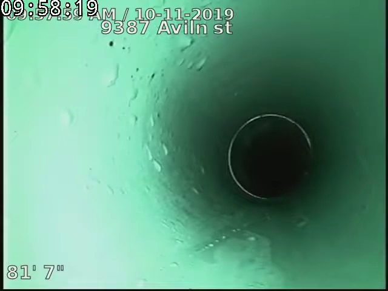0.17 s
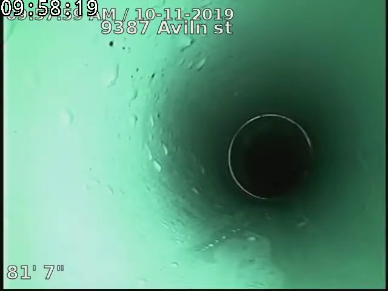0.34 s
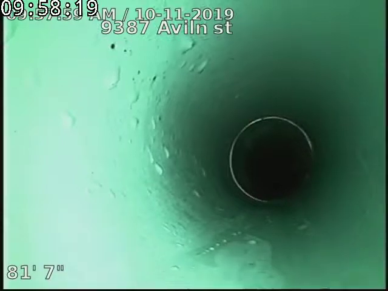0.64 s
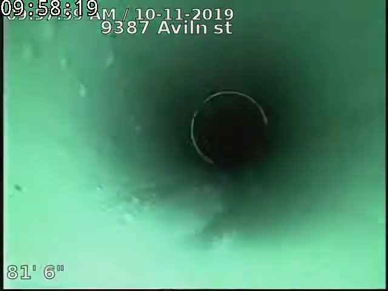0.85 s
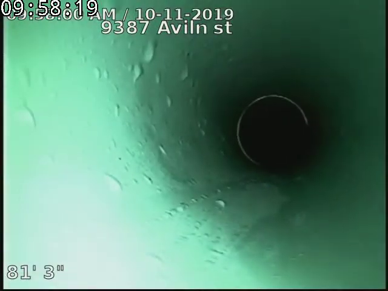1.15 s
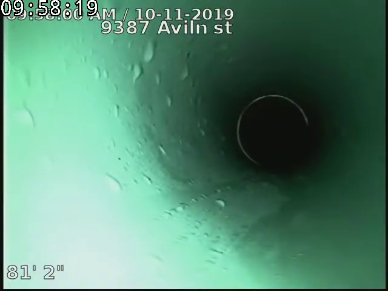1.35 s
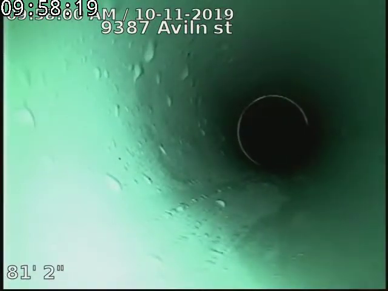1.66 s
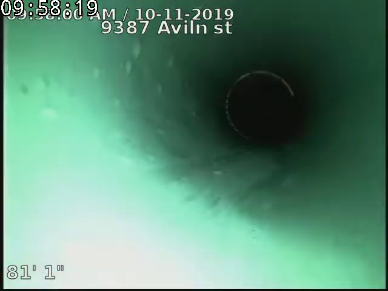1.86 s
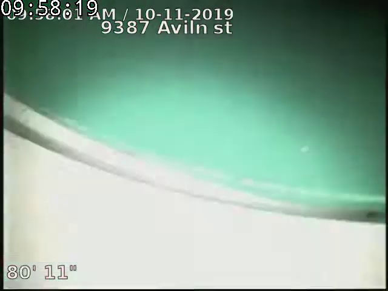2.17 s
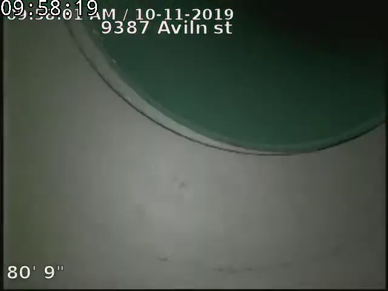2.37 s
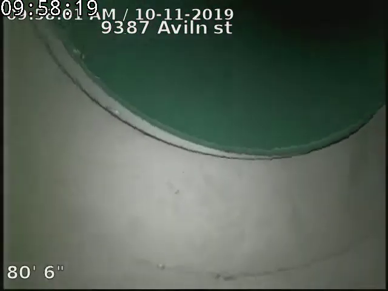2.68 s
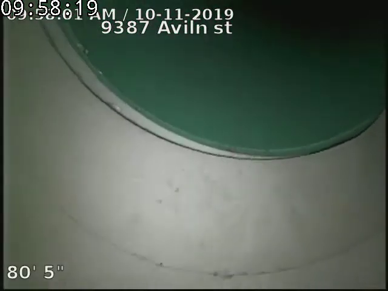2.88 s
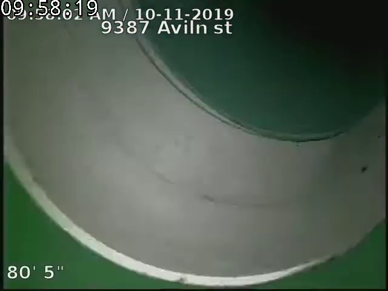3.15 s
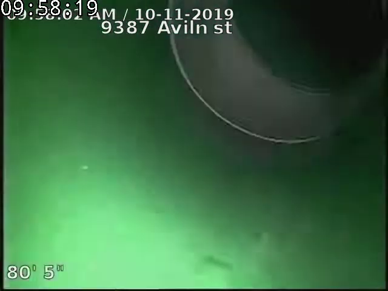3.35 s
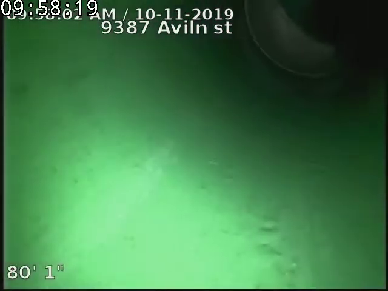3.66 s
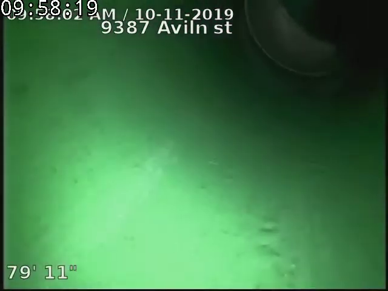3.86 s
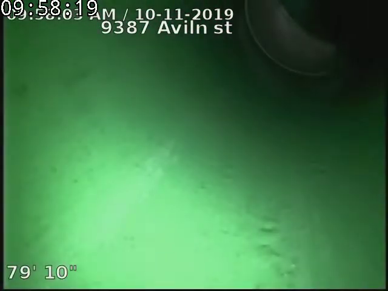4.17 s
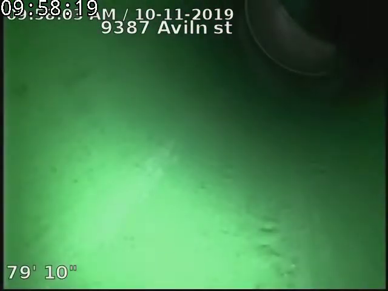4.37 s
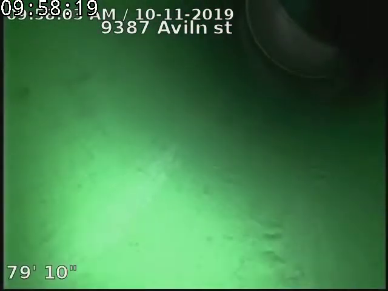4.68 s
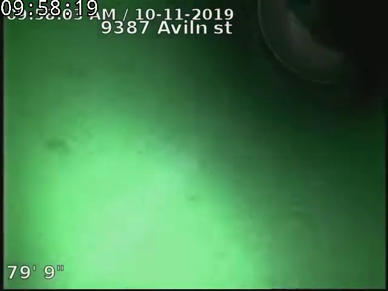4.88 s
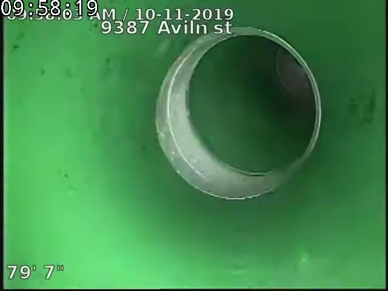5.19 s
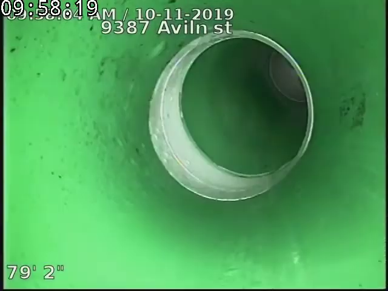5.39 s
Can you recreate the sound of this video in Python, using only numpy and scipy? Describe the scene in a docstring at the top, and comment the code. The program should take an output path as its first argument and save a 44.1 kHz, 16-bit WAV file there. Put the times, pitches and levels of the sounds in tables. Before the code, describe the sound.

A stiff rod is hauled hand over hand through a guide, with dry bright scrapes, sharp snaps against metal bars and dull frame thumps.

```python
"""A stiff fibreglass rod scrapes through its guide as it is hauled out of a drain pipe hand over hand:
sparse random friction impulses excite resonances, in four long pulls and many light slips.
Between pulls a glove swishes forward along the rod: denser impulses, shaped by the speed of the hand.
The coil snaps on the cage bars and thumps the frame (sums of decaying modes); the turning reel rumbles,
its hoop hums (impulses through narrow resonances), and faint room and preamp hiss lies below."""
import sys
import numpy as np
from scipy import signal
from scipy.fft import rfft, irfft
from scipy.io import wavfile
from scipy.ndimage import map_coordinates

SR = 44100
rng = np.random.default_rng(int(sys.argv[2]) if len(sys.argv) > 2 else 0)


def wav_record(signal):
    """Record a signal, one row per channel, as 16-bit PCM in the file named by sys.argv[1]."""
    frames = np.transpose(np.atleast_2d(signal))
    bounded = np.clip(frames, -1, 1)
    # unit amplitude maps onto the largest positive 16-bit level
    quanta = np.round(bounded * 32767).astype(np.int16)
    wavfile.write(sys.argv[1], SR, quanta)


N = 243873


def amp(db):
    """Logarithmic level law: 20 dB is a factor of ten in amplitude."""
    return 10 ** (np.asarray(db) / 20)


def rms_one(x):
    """Power normalisation: scale to rms 1."""
    return x / np.sqrt(np.mean(x ** 2) + 1e-20)


def in_time(rows):
    """Linear interpolation: the columns after the time column become curves over all samples."""
    time_s, *columns = np.transpose(rows)
    return [np.interp(np.arange(N) / SR, time_s, column) for column in columns]


def drift(rate_hz):
    """Low-passed noise: a random curve of rms 1, made at a twentieth of the sample rate."""
    pole = np.exp(-40 * np.pi * rate_hz / SR)
    noise = rng.standard_normal(N // 20 + 2002)
    slow = signal.lfilter([1], [1, -2 * pole, pole * pole], noise)[2000:]   # without the onset
    return np.interp(np.arange(N) / 20, np.arange(len(slow)), rms_one(slow))


def grit(per_s, spread_db):
    """Stick-slip friction: impulses at random moments with uneven sizes and either sign."""
    sizes = amp(spread_db * np.minimum(rng.exponential(1, N), 4))
    signed = sizes * rng.choice([-1, 1], N)
    return signed * (rng.random(N) < per_s / SR) + 1e-18


def resonate(x, peaks, patchy_db, rate_hz=6.0, order=1):
    """Parallel resonance: each peak flickers as the contact point wanders; the sum has rms 1."""
    out = 0
    for k, (hz, width_hz, level_db) in enumerate(peaks):
        pole = np.exp(-np.pi * width_hz / SR)
        feedback = [1, -2 * pole * np.cos(2 * np.pi * hz / SR), pole * pole]
        band = x
        for _ in range(order):
            band = signal.lfilter([(1 - pole * pole) / 2, 0, (pole * pole - 1) / 2], feedback, band)
        sign = (-1) ** (k * order)
        out = out + sign * amp(level_db + patchy_db * drift(rate_hz)) * band
    return rms_one(out)


def coloured(x, spectrum):
    """Linear filtering: shape by gains in dB over log frequency, then scale to rms 1."""
    hz, gain_db = np.transpose(spectrum)
    grid_hz = np.maximum(np.fft.rfftfreq(N, 1 / SR), 1)
    gain = amp(np.interp(np.log(grid_hz), np.log(hz), gain_db))
    return rms_one(irfft(rfft(x) * gain, N))


def ring(hz, t60_s, size):
    """Damped free vibration: a sine that loses 60 dB in t60_s."""
    t = np.arange(size) / SR
    return np.sin(2 * np.pi * hz * t) * amp(-60 * t / t60_s)


def high_pass(x, hz):
    """Radiation efficiency: a small body radiates little bass."""
    return signal.sosfilt(signal.butter(2, hz, "high", fs=SR, output="sos"), x + 1e-18)


def wander(x, share, rate_hz):
    """Frequency modulation: read x at an uneven speed so that its pitch wavers."""
    position = np.cumsum(1 + share * drift(rate_hz)) % (N - 1)
    return map_coordinates(x, [position], order=3)


def add(out, x, start_s):
    """Superposition: mix x into out from start_s."""
    i = round(start_s * SR)
    out[i:i + len(x)] += x[:N - i]


def air():
    """Stationary noise: coloured room and preamp hiss with a small drift in level."""
    # hiss spectrum: hz, gain_db
    hiss_spectrum = [(18, -12), (30, -7.5), (86, 0.5), (240, -4.5), (381, -21), (800, -30), (1400, -24),
                     (2800, -25.5), (5370, -16.5), (8320, -21.5), (10800, -11.5), (13900, -22.5)]
    return amp(-57.5 + 2.0 * drift(7.4)) * coloured(rng.standard_normal(N), hiss_spectrum)


def reel(hum):
    """Forced resonance: small jolts keep the cage and its hoop sounding while the coil turns."""
    # rumble of the turning reel: time_s, level_db
    rumble_levels = [(0.0, -57), (0.03, -62), (0.37, -60), (0.4, -48.5), (0.52, -53), (0.542, -36.5),
                     (0.58, -44.5), (0.63, -50), (1.26, -62.5), (1.57, -45), (1.62, -53.5), (1.91, -61),
                     (1.96, -50), (2.28, -55.5), (2.46, -43.5), (2.79, -63.5), (2.91, -47), (2.94, -56),
                     (3.36, -50), (4.31, -67), (4.36, -49.5), (4.45, -48), (5.11, -53.5), (5.25, -70.5),
                     (5.3, -54), (5.53, -62)]
    # cage resonances: pitch_hz, width_hz, level_db
    cage_peaks = [(62.5, 23, -1.5), (120.6, 20.2, 4), (245.3, 66, 0.5), (307, 293, -6.5), (470, 185, -6.5)]
    # hoop resonances: pitch_hz, width_hz (of each of two passes), level_db
    hoop_peaks = [(894, 52, 0.5), (918.2, 34.5, -0.5), (1003, 95, -6), (1072, 80, -6.5)]
    hum_idle_db = -76.5   # the hoop never falls quite silent
    rumble_db, = in_time(rumble_levels)
    rumble = resonate(grit(900, 2.8), cage_peaks, patchy_db=2.0)
    hoop = resonate(grit(4000, 2.0), hoop_peaks, patchy_db=1.5, rate_hz=10.0, order=2)
    hoop = wander(hoop, share=0.0091, rate_hz=7.98)
    hum_gain = np.hypot(hum, amp(hum_idle_db))
    return amp(rumble_db + 2.0 * drift(4.5)) * rumble + hum_gain * hoop


def thumps():
    """Modal excitation: uneven shoves of the coil drive the frame; harder ones reach the upper modes."""
    # blows on the frame: start_s, level_db, hardness_db (upper modes), boom_db (lowest mode),
    # lean_s (time scale of the shove on the lowest mode)
    blows = [(0.538, -35, -7, -19, .02), (0.829, -51, -14, 17, 0.064), (1.074, -36.5, 2, -10, .015),
             (1.192, -34, 1.5, -9, 0.019), (1.273, -51.5, -20, 17, 0.038), (1.425, -15, -4, 6, 0.03),
             (1.56, -53, 6, 7, .015), (2.013, -23, -7.5, -4, 0.029), (2.347, -28.5, -8, -1, 0.0078),
             (2.436, -28, -8, -25, .015), (2.499, -21, -11, 3, 0.028), (2.531, -27, -13, 8.5, 0.016),
             (2.849, -52, -12, 23.5, 0.022), (3.125, -29.5, -12, 5.5, 0.017), (3.25, -36, 1.5, 9.5, 0.022),
             (3.573, -24, -22, -2, 0.022), (4.223, -44.5, -5, -6, .02), (4.423, -32.5, -0.5, 0, 0.012),
             (4.953, -20, -20, -4.5, 0.019), (5.286, -52.5, 6.5, 5, 0.023)]
    # frame modes: pitch_hz, level_db, t60_s
    frame_modes = [(239.7, -12.5, 0.12), (307.4, -15, 0.052), (456, -13, 0.029), (512, -11.5, 0.0032),
                   (610, -18, 0.016), (946, -20, 0.21), (1091, -9, 0.019), (1510, -15, 0.0063),
                   (1744, -20, 0.073)]
    out, size = np.zeros(N), 8000
    t = np.arange(size) / SR
    for start_s, thump_db, hard_db, boom_db, lean_s in blows:
        hit = 0
        for hz, mode_db, t60_s in frame_modes:
            lowest = hz < 280
            # above the lowest mode, lower modes take longer to build up
            build_s = lean_s if lowest else 0.021 * (300 / hz) ** .5
            phase = t / build_s
            # the shove is partly in step with the mode, most firmly with the lowest
            in_step = 1 if lowest else 0.18
            rocking = rng.standard_normal(size) + in_step * np.sin(2 * np.pi * hz * t)
            shove = rocking * np.sqrt(phase) * np.exp(-3 * phase ** 2)
            mode = signal.fftconvolve(shove, ring(hz, t60_s, size))[:size]
            gain = amp(mode_db + hard_db * (hz > 580) + boom_db * lowest)
            hit = hit + gain * mode / np.abs(mode).max()
        add(out, amp(thump_db) * hit, start_s)
    return high_pass(out, 223)


def snaps():
    """Impact on a bar: a brief burst of contacts rings its modes; a short rasp follows as the rod settles."""
    # rod snaps on a bar: start_s, level_db, low_reach_db (low modes), top_reach_db (top modes)
    impacts = [(0.252, -37.5, 19, -18), (0.3326, -39, -4, -10), (0.5478, -12, -14, -6),
               (0.946, -41, 19, -8), (1.1917, -32, 23, -19), (1.199, -38, 29, -15), (1.3308, -36, 12, -8),
               (1.4233, -22, 2, -16), (1.4265, -14.5, -19, 0), (1.428, -18.5, 3, 12),
               (2.4394, -5.5, -6.5, -23), (2.517, -27, 11, -14), (2.6999, -38, -11, 32),
               (3.549, -32, -27, 15), (3.5748, -7.5, -3, -28), (3.94, -35, -25, 13), (4.346, -27, -25, 28),
               (4.4261, -14, -28, -6), (5.468, -35, 22.5, 19)]
    # bar modes: pitch_hz, level_db, t60_s (before the shortening of light touches)
    bar_modes = [(1138, -3.5, 0.038), (2050, -2, 0.02), (2730, -5.5, 0.024), (3830, 2.5, 0.015),
                 (4350, -1.5, 0.013), (4920, 6, 0.0034), (5510, 0, 0.0098), (7260, 7, 0.0085),
                 (9320, 8, 0.0057), (11090, 11.5, 0.0042)]
    # a light touch rings shorter and lands on another bar: shares
    light_damping, light_detune = 0.12, 0.18
    out, size = np.zeros(N), 5000
    t = np.arange(size) / SR
    for start_s, snap_db, low_db, top_db in impacts:
        body = 0
        light = np.clip((-22 - snap_db) / 10, 0, 1)   # 0 firm, 1 light
        for hz, mode_db, t60_s in bar_modes:
            reach_db = np.interp(hz, [1500, 4000, 6000, 8500], [low_db, 0, 0, top_db])
            gain = amp(mode_db + reach_db + rng.normal(0, 1 + 2 * light))
            mode_hz = hz * (1 + light_detune * light * rng.uniform(-0.57, 1))
            body = body + gain * ring(mode_hz, t60_s * (1 - light_damping * light), size)
        # one full contact, then noise from 15 dB lower that loses 60 dB in 5 ms
        contacts = rng.standard_normal(size) * amp(-60 * t / .005 - 15)
        contacts[0] = 1
        hit = signal.fftconvolve(contacts, body)[:size]
        rasp = rng.standard_normal(size) * amp(-19.5 - 60 * t / 0.029) * np.minimum(t / 0.00067, 1)
        add(out, amp(snap_db) * (hit / np.abs(hit).max() + rasp), start_s)
    return high_pass(out, 400)


def swishes():
    """Sliding friction of fabric on smooth rod: dense slips whose loudness follows the hand's speed."""
    # glove strokes: start_s, length_s, fastest (share of length), level_db, sheen_db (very top),
    # lag_s (delay of the lower part)
    strokes = [(0.954, 0.21, 0.44, -34.5, -3.5, 0.00033), (2.261, 0.18, 0.71, -30, -2, 0.0024),
               (3.602, 0.2, 0.71, -31, -1, 0.0074), (5.104, 0.21, 0.51, -34, 1, 0.012)]
    # friction spectrum: hz, gain_db
    fabric_spectrum = [(900, -48), (1400, -26), (1900, -10.5), (3100, -9.5), (5200, -6.5), (7000, -4),
                       (8800, -4), (11000, 7.5), (12300, 3.5), (13800, -0.5)]
    # rod ringing under the glove: pitch_hz, width_hz, level_db
    glove_rings = [(7000, 260, 0.55), (7650, 110, 2.5), (11600, 300, 1.6), (13000, 1100, 1.5)]
    rings_db = -16.5
    cruise = 0.87   # share of the stroke's arch above which the hand keeps a steady speed
    arch_power = 1.27   # gain grows with this power of the hand's speed
    t = np.arange(N) / SR
    slips = coloured(grit(14000, 0.97), fabric_spectrum)
    ringing = resonate(grit(10000, 0.9), glove_rings, patchy_db=2.0, rate_hz=16.0)
    slips = rms_one(slips + amp(rings_db) * ringing)
    hz = np.fft.rfftfreq(N, 1 / SR)
    top = irfft(rfft(slips) * np.clip((hz - 8000) / 3000, 0, 1), N)
    lower = slips - top
    out = 0
    for start_s, length_s, fastest, stroke_db, sheen_db, lag_s in strokes:
        for part, late_s, part_db in (top, 0, stroke_db + sheen_db), (lower, lag_s, stroke_db):
            turn = np.interp((t - start_s - late_s) / length_s, [0, fastest, 1], [0, .5, 1])
            speed = np.minimum(np.abs(np.sin(np.pi * turn)) / cruise, 1)
            out = out + amp(part_db) * speed ** arch_power * part
    return amp(0.46 * drift(110.0)) * out


def pull_gain():
    """Amplitude envelopes: scrape and hum gains of the long pulls, silent between them."""
    # four long pulls, each a list of: time_s, scrape_db, hoop_hum_db
    pull_curves = [
        [(0.32, -62, -67), (0.336, -47.5, -74), (0.388, -47.5, -50), (0.518, -41, -81), (0.544, -42, -37.5),
         (0.564, -46.5, -40), (0.588, -45.5, -63), (0.65, -48, -54), (0.714, -45.5, -51), (0.782, -51.5, -61),
         (0.9, -94, -65)],
        [(1.6, -69, -77), (1.66, -50, -58), (1.716, -73, -78), (1.752, -58.5, -77), (1.792, -62.5, -57.5),
         (1.946, -45, -62.5), (2.018, -45.5, -48), (2.138, -39.5, -55.5), (2.24, -48, -52), (2.254, -53, -63),
         (2.31, -42.5, -54)],
        [(2.86, -65, -63), (2.992, -40, -64), (3.106, -51, -57), (3.148, -40.5, -50.5), (3.232, -43.5, -55),
         (3.25, -42.5, -41.5), (3.342, -43.5, -57.5), (3.386, -39, -57.5), (3.498, -46, -64), (3.54, -58, -84)],
        [(4.33, -79, -74), (4.342, -46, -53), (4.402, -55.5, -69), (4.43, -41, -44.5), (4.458, -41, -50.5),
         (4.54, -44.5, -62), (4.588, -43, -48.5), (4.704, -39, -57), (4.75, -38.5, -49.5), (4.828, -40.5, -53),
         (4.93, -57, -70)],
    ]
    t = np.arange(N) / SR
    out = 0
    for rows in pull_curves:
        during = (t > rows[0][0]) & (t < rows[-1][0])
        out = out + amp(in_time(rows)) * during
    return out


def slip_gains():
    """Attack and exponential decay: each slip starts abruptly, holds and dies away; powers add."""
    # light slips and scuffs between and during pulls: start_s, hold_s, bright_db, dull_db
    light_slips = [(0.0, 0.184, -50, -62.5), (0.207, 0.0043, -41.5, -54), (0.236, 0.024, -75, -52.5),
                   (0.34, 0.0088, -54, -47.5), (0.364, 0.0071, -63, -43.5), (0.552, .003, -52, -37),
                   (0.926, 0.087, -56, -61.5), (1.161, 0.076, -77, -60), (1.224, 0.12, -64, -69.5),
                   (1.34, 0.035, -49, -64), (1.434, 0.018, -47.5, -40.5), (1.504, 0.082, -57.5, -81),
                   (2.014, 0.0072, -48, -45), (2.42, 0.073, -51.5, -50), (2.543, 0.078, -61.5, -60),
                   (2.696, 0.028, -51.5, -68), (3.552, 0.02, -46, -68), (3.573, 0.055, -58, -51),
                   (3.756, 0.086, -52.5, -60.5), (3.951, 0.23, -56, -75), (4.133, 0.084, -56.5, -67),
                   (4.433, 0.0072, -51, -41.5), (4.95, 0.058, -57, -55.5), (5.057, 0.016, -40, -49.5),
                   (5.103, 0.028, -45, -57.5), (5.32, 0.011, -55.5, -61.5), (5.467, 0.0073, -52, -64.5)]
    rise_db_per_s, fall_db_per_s = 1505, 242
    t, power = np.arange(N) / SR, 0
    for start_s, hold_s, bright_db, dull_db in light_slips:
        before_s = np.maximum(start_s - t, 0)
        after_s = np.maximum(t - start_s - hold_s, 0)
        loss_db = np.minimum(rise_db_per_s * before_s + fall_db_per_s * after_s, 200)
        power = power + amp([[bright_db], [dull_db]]) ** 2 * amp(-loss_db) ** 2
    return np.sqrt(power)


def catches():
    """Stick-slip catching: brief jumps in gain as the rod catches, a few set and many small at random."""
    # set catches in the guide: time_s, jump_db
    set_catches = [(3.1408, 15), (4.623, 4), (4.684, 11), (4.832, 4)]
    catch_s, small_per_s, small_db = 0.0011, 36, 1.5   # Gaussian width, rate, typical size
    small = rng.random(N) < small_per_s / SR
    jumps_db = small_db * np.minimum(rng.exponential(1, N), 3) * small
    for time_s, jump_db in set_catches:
        jumps_db[round(time_s * SR)] = jump_db
    t = np.arange(-400, 401) / SR
    bump = np.exp(-.5 * (t / catch_s) ** 2)
    return amp(signal.fftconvolve(jumps_db, bump, "same"))


def pulls(pull):
    """Friction-driven resonance: the rod grates in the guide; pressure brings up duller resonances."""
    # rod in the guide: pitch_hz, width_hz (of each of two passes), level_db
    guide_peaks = [(4410, 1220, -7), (5340, 1500, -2), (7070, 1450, -4.5), (8080, 3000, -8.5),
                   (10420, 890, -4.5), (10895, 650, 5.5), (12020, 1140, -5.5), (13430, 4800, -7.5)]
    # duller resonances under pressure: pitch_hz, width_hz, level_db
    pressed_peaks = [(658, 397, 4), (1610, 2790, 6.5), (2270, 1010, 9.5)]
    press_db = -11   # dull scrape of a pull against its bright scrape
    scrape, pressure = np.hypot(slip_gains(), pull * amp([[0], [press_db]]))
    bright = resonate(grit(5000, 1.15), guide_peaks, patchy_db=2.0, rate_hz=9.9, order=2)
    bright = wander(bright, share=.012, rate_hz=9.0)   # pitch wavers with the bend of the rod
    dull = resonate(grit(5000, 0.76), pressed_peaks, patchy_db=0.5)
    flutter = amp(0.77 * drift(78.0))
    return flutter * (scrape * catches() * bright + pressure * dull)


def scene():
    """Linear superposition: all sources add in one channel."""
    pull, hum = pull_gain()
    return (air() + reel(hum) + thumps() + snaps() + swishes() + pulls(pull))[None]


def record(dry):
    """Band limitation: an elliptic low-pass cuts the top steeply above 13860 Hz."""
    return signal.sosfilt(signal.ellip(12, .5, 75, 13860, fs=SR, output="sos"), dry)


dry = scene()
out = record(dry)
wav_record(out)
```